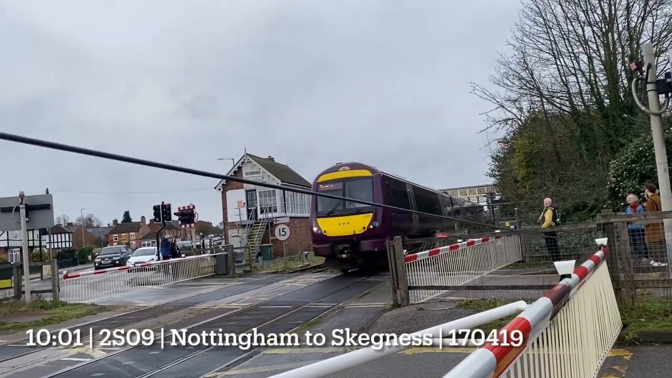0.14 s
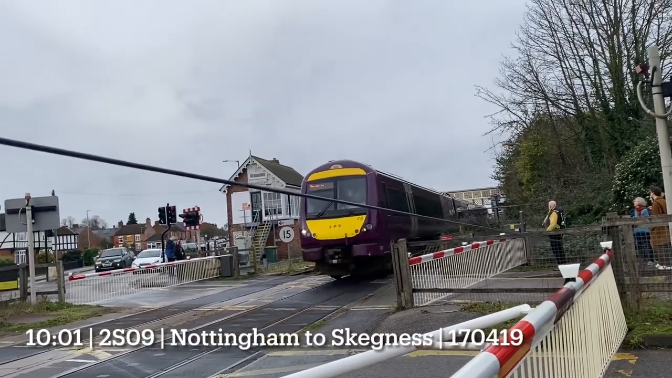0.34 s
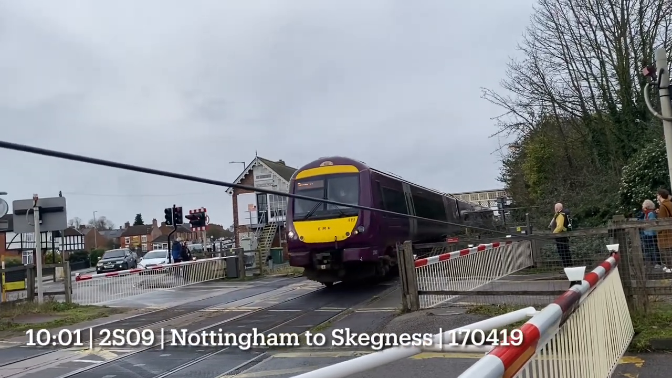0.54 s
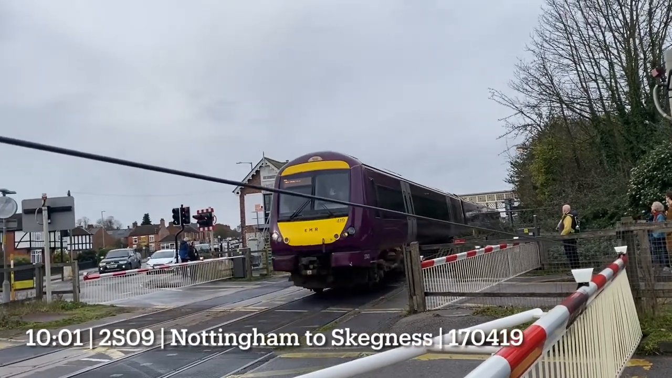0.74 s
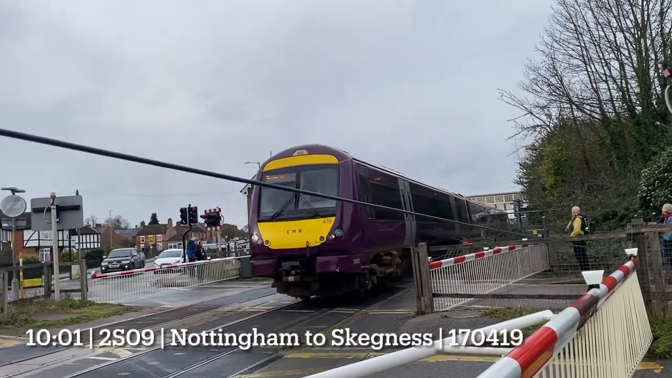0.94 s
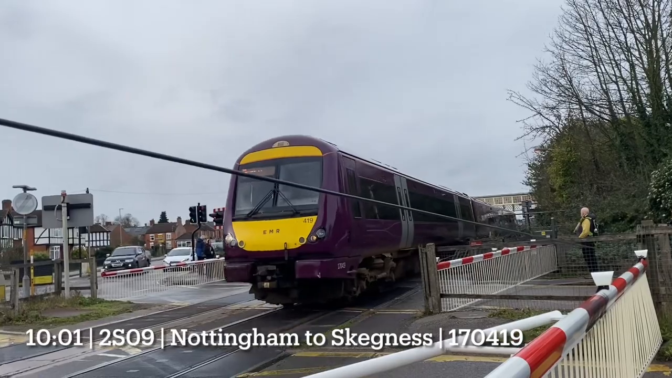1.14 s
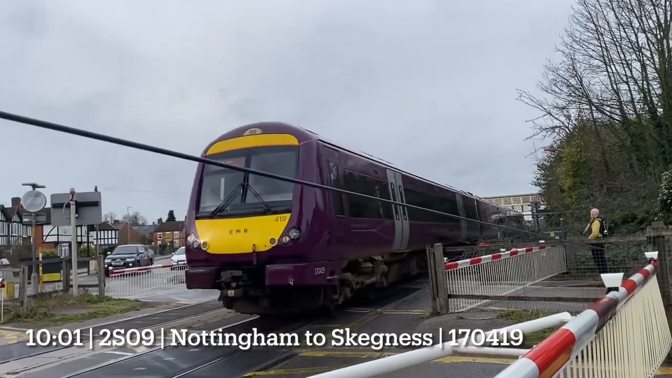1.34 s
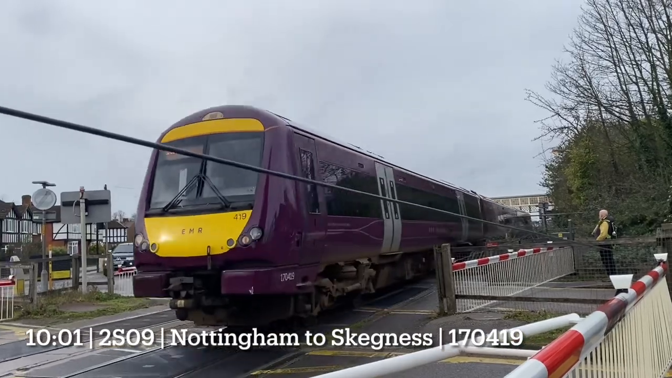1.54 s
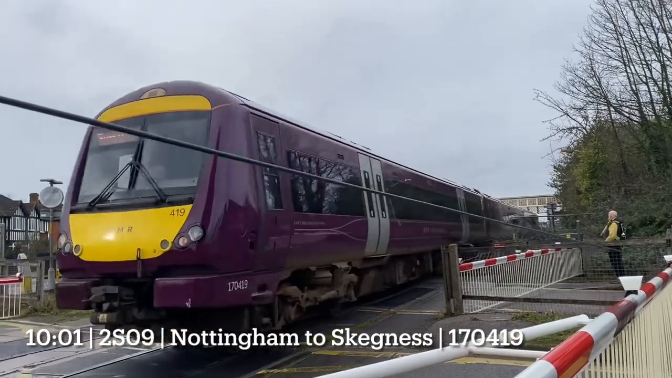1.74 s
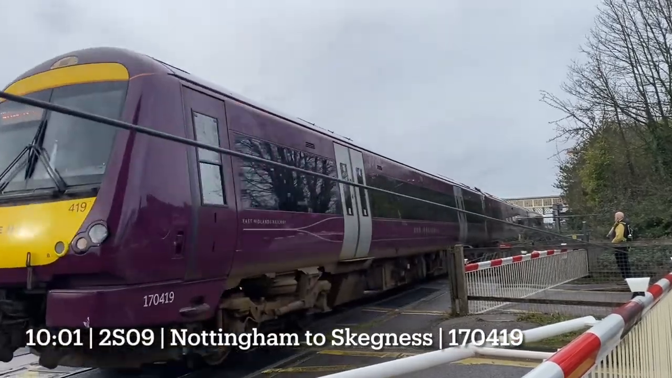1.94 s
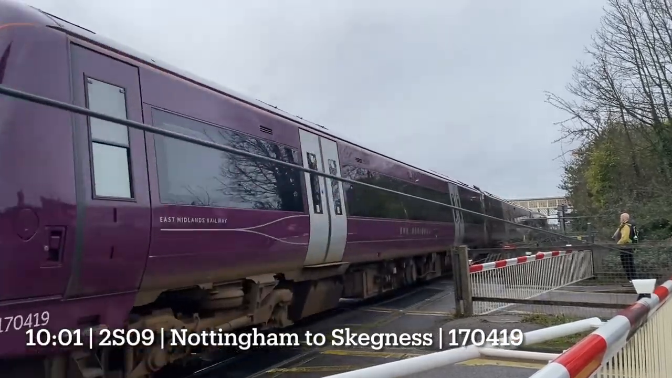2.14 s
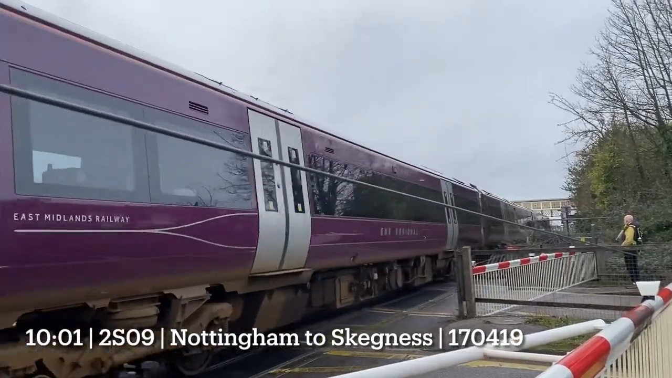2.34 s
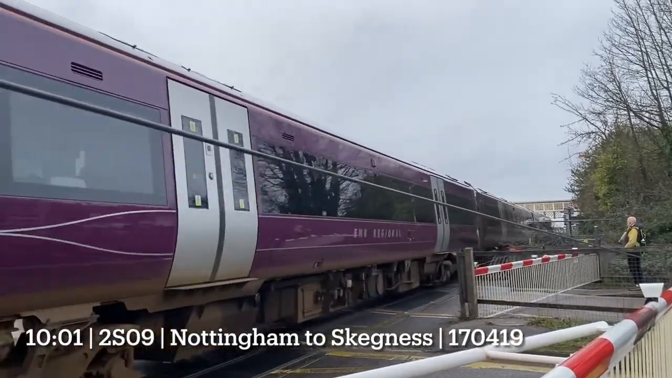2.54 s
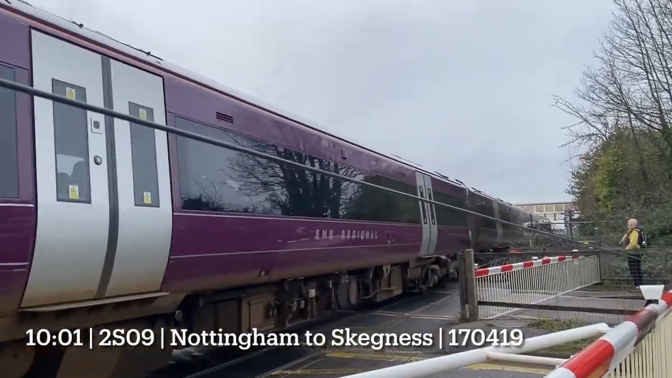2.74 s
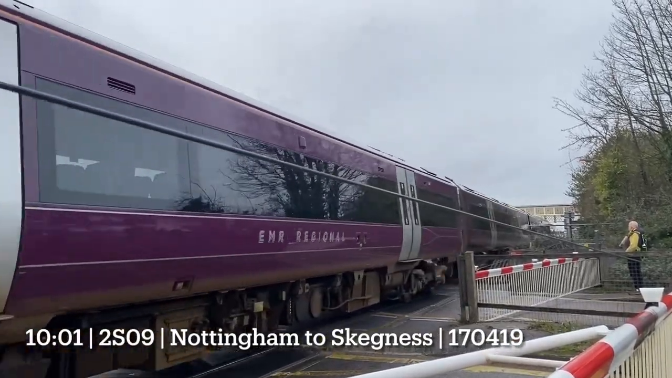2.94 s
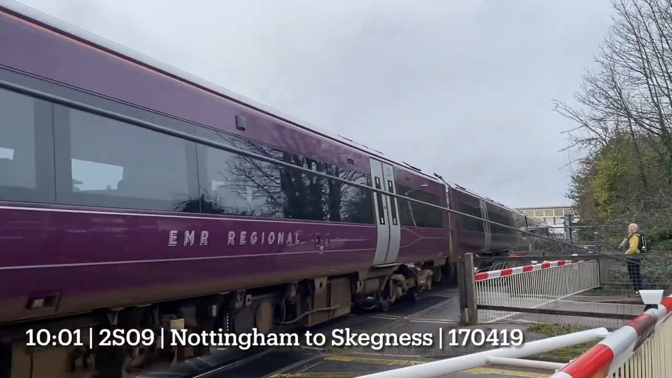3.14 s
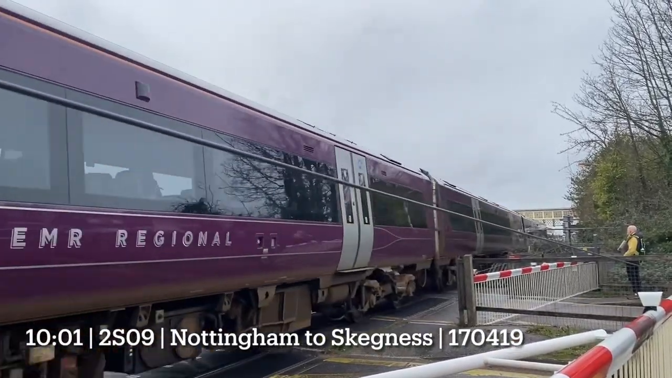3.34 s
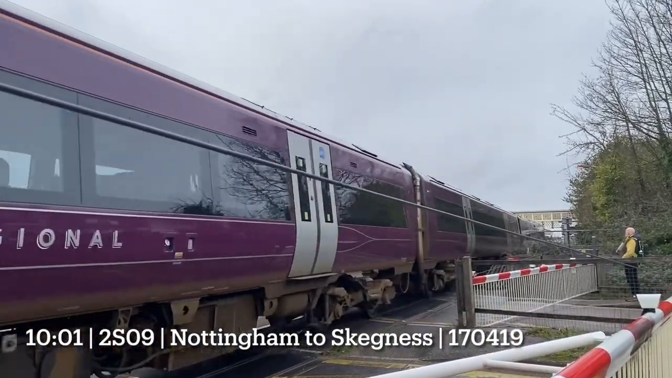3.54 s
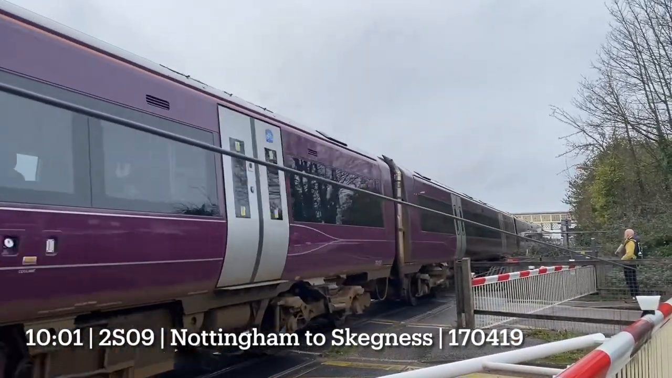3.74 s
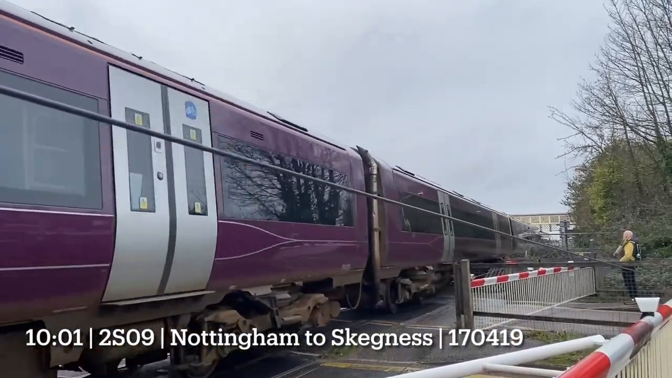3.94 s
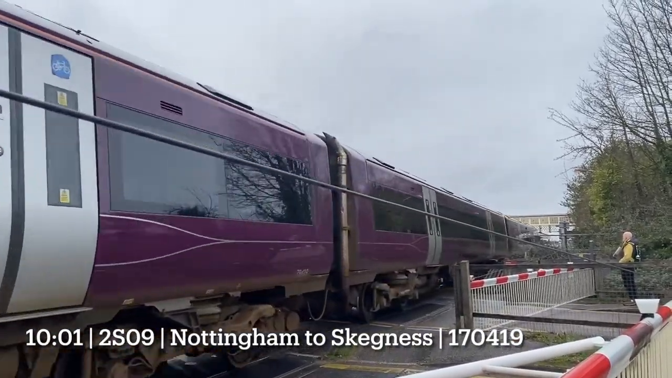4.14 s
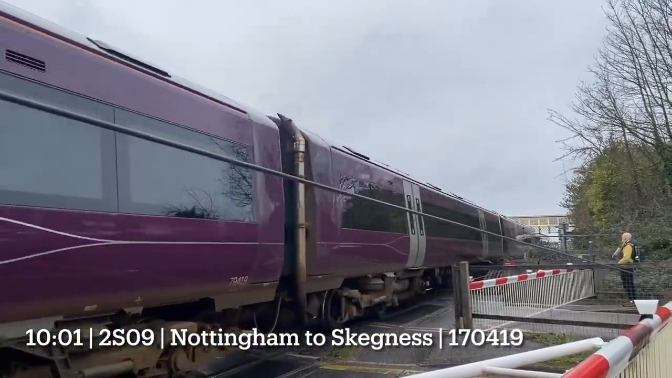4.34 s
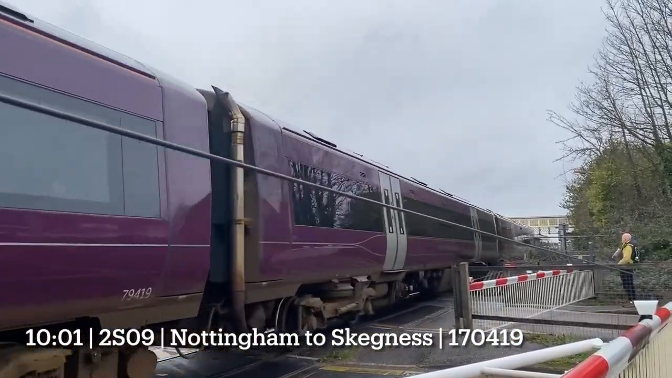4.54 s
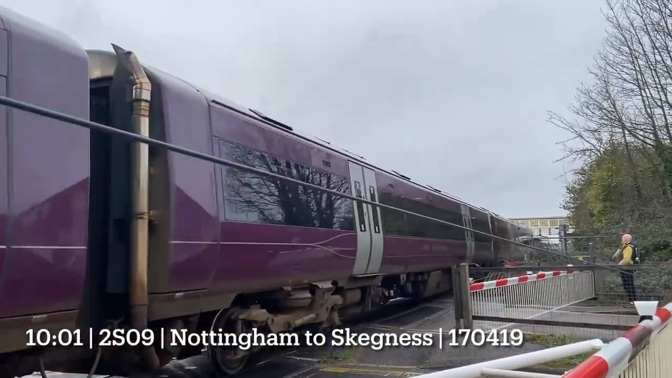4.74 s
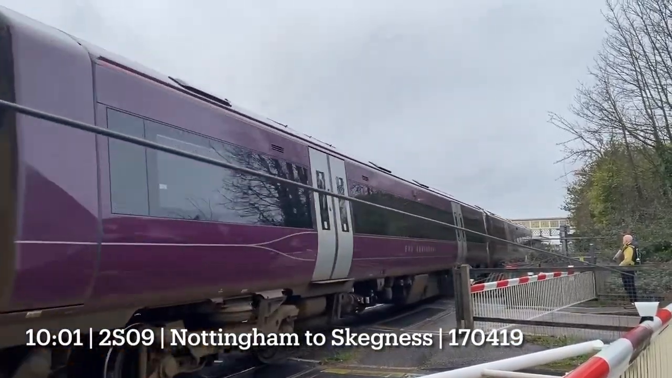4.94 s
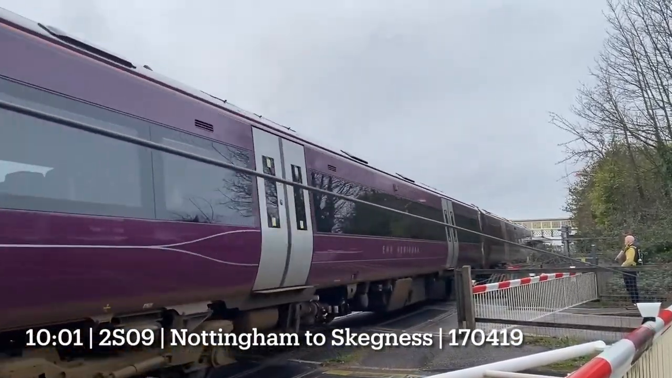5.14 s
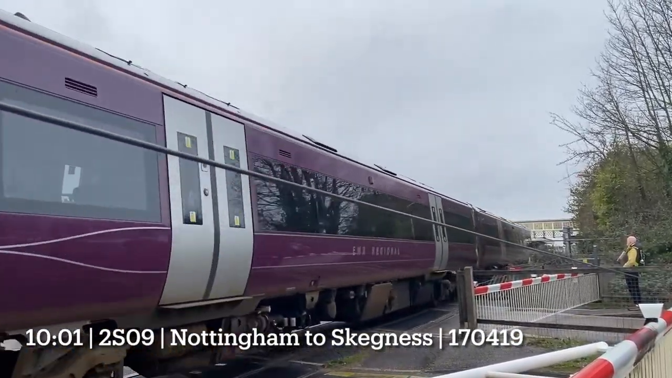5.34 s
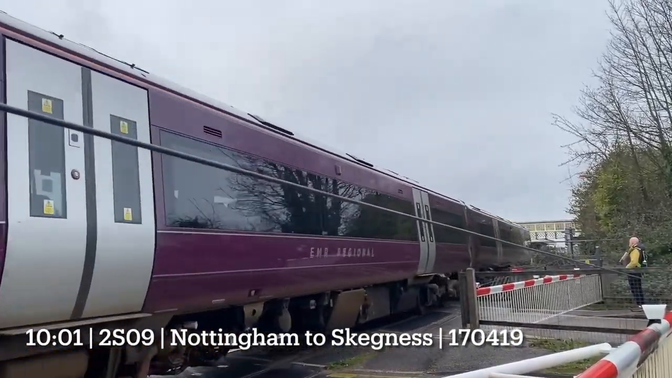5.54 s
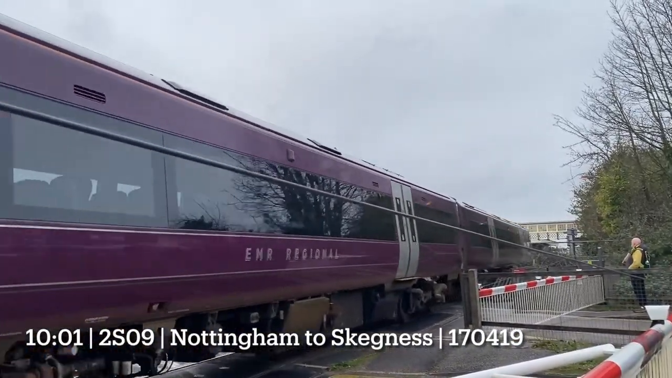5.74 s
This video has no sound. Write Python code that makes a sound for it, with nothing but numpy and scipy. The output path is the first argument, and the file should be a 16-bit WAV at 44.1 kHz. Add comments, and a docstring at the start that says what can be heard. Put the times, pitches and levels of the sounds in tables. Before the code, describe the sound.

Outdoors beside a level crossing, a diesel multiple-unit train approaches from ahead as low rumble and faint wheel singing, then passes a few metres to the left. Bogies thump and knock over a rail joint around three seconds, the level ducks briefly, then engine drone, steel scraping and further knocks continue, ending in bright hissing air. Close, full stereo pickup; the train is still passing at the end.

```python
"""A diesel passenger train comes from the front and passes a few metres away to the left, over a level crossing.
From the start rough wheels and rails roar as shaped noise, engines drone as stacked tones, and wavering tones hum and sing.
Soon slipping steel scrapes, the underframe thumps, and decaying tones and clicks knock, axle by axle, over a joint.
Going by, the engines sink in pitch; the level dips briefly just after three seconds.
At the end the second car brings a bright rush of air, made of hissing noise."""
import sys
import numpy as np
from scipy import signal
from scipy.fft import rfft, irfft, next_fast_len
from scipy.io import wavfile
from scipy.ndimage import uniform_filter1d

SR = 44100
rng = np.random.default_rng(int(sys.argv[2]) if len(sys.argv) > 2 else 0)


def unload_wav(signal):
    """Save mono or channel-first audio to the path in sys.argv[1] as 16-bit WAV at rate SR, clipped to [-1, 1]."""
    wavfile.write(
        sys.argv[1],
        SR,
        np.round(np.clip(np.atleast_2d(signal).T, -1, 1) * 32767).astype(np.int16),
    )


N = 259308
T = np.arange(N) / SR
HZ = np.maximum(np.arange(N // 2 + 1) * SR / N, 1)   # 1 at least, so that its logarithm exists
RIM_HZ = 2543   # the lower ring of a wheel's rim


def from_db(db):
    """Turn decibels into gain."""
    return 10 ** (np.asarray(db) / 20)


def rms_one(x):
    """Scale to unit power."""
    return x / np.sqrt(np.mean(x ** 2) + 1e-20)


def in_time(rows):
    """Draw a curve through points in time, at every sample."""
    s, value = np.transpose(rows)
    return np.interp(T, s, value)


def over_hz(points):
    """Draw a curve through points in pitch, on the frequency grid."""
    hz, value = np.transpose(points)
    return np.interp(np.log(HZ), np.log(hz), value)


def white():
    """The spectrum of fresh white noise: equal chance at every pitch."""
    return rng.standard_normal(len(HZ)) + 1j * rng.standard_normal(len(HZ))


def drift(rate_hz):
    """Slow random wandering with spread 1."""
    return rms_one(irfft(white() / (1 + (HZ / rate_hz) ** 2), N))


def arrive(x, lead_ms, left_db=0):
    """A sound from the left reaches the left microphone earlier, and can differ in level between the two."""
    half = np.exp(1j * np.pi * HZ * lead_ms / 1000) * from_db(left_db / 2)
    return irfft(rfft(x) * np.array([half, 1 / half]), N)


def passing(s, half_s):
    """Gain of a source that goes by, 1 when abeam."""
    return 1 / (1 + ((T - s) / half_s) ** 2)


def swell(s, half_s):
    """A smooth rise and fall, 1 at the top."""
    return np.exp(-((T - s) / half_s) ** 2)


def plateau(s, half_s):
    """A quick rise, a hold near 1 and a quick fall."""
    return 1 / (1 + ((T - s) / half_s) ** 6)


def distance_db(behind_m=0):
    """Loss with distance: a part of the train closes in at steady speed, then the train stays alongside."""
    speed_m_per_s, track_m, arrival_m = 9.2, 6.86, 22   # track: how far away the rails are
    ahead_m = np.maximum(arrival_m + behind_m - speed_m_per_s * T, 0)
    return 20 * np.log10(track_m / np.hypot(track_m, ahead_m))


def lifts_db():
    """Booms and passing bogies lift the four parts of the rolling noise."""
    # The underframe booms on uneven track. Each row: loudest in seconds, half length in seconds, lift in dB.
    boom_rows = [(0.033, 0.081, 8), (.33, 0.066, 6.5), (1.25, 0.065, 5.5), (1.473, 0.039, 3.5),
                 (2.056, 0.042, 3.5), (2.26, 0.044, 5.5), (2.6, 0.72, 5.5), (3.537, 0.13, 7),
                 (4.456, 0.17, 1), (5.356, 0.16, 4.5)]
    # Bogies rolling by. Each row: loudest in seconds, half length in seconds,
    # then the lift in dB of bogie roar, rail roar and wheel hiss.
    bogie_rows = [(2.0, 0.22, 0.5, 1.5, 0.5), (2.92, 0.66, 3, 4.9, 5.4), (4.16, 0.4, -1, 4, 4.5),
                  (4.95, 0.39, -1.8, 0.5, 3), (5.755, 0.59, 0.3, 4, 5)]
    boom_in_bogie = 0.34   # share of a boom's lift that the bogie roar takes
    boom = sum(db * swell(s, half_s) for s, half_s, db in boom_rows)
    bogie, rail, wheel = sum(np.outer(dbs, swell(s, half_s)) for s, half_s, *dbs in bogie_rows)
    return boom, bogie + boom_in_bogie * boom, rail, wheel


def ripple(depth_db, spacing_hz):
    """Wheels and rails have countless close modes: an uneven fine structure in the spectrum."""
    hz = np.arange(0, SR, spacing_hz)
    uneven = np.interp(HZ, hz, rng.standard_normal(len(hz)))
    return from_db(depth_db * uneven * np.minimum(HZ / 700, 1))


def rolling(ahead_ms=0.0078, flutter_hz=12, ripple_db=3.0, spacing_hz=35):
    """Rough steel shakes underframe, bogies, rails and wheels; the sound spreads from ahead round to the left."""
    # Tone colour as the train comes near, and alongside. Each row: pitch in Hz, relative level in dB per Hz.
    far_colour = [(20, -28), (42, 1), (66, 11), (120, 2.5), (230, -5.5), (480, -11), (600, -25), (750, -29),
                  (1100, -26), (1300, -30), (1500, -35), (1750, -38), (2200, -35), (3200, -39.5),
                  (4500, -38.5), (6000, -45.5), (12000, -93), (16000, -55)]
    near_colour = [(20, -39), (45, 3.5), (85, 9.5), (130, 1.5), (330, 1), (550, -10), (780, -14.5),
                   (1100, -17.5), (1450, -21.5), (2000, -21.5), (2500, -20), (3200, -27.5), (4600, -24.5),
                   (5200, -30), (6500, -33), (11500, -88), (16000, -40)]
    # Unscattered noise that arrives from the left. Each row: time in seconds, share of power from 0 to 1.
    abeam_rows = [(0, 0.15), (1.6, 0), (2.3, 0.13), (3.1, 0.77), (3.7, 0.33), (4.4, 0.97), (5.2, 0.46),
                  (5.88, 0.66)]
    # Scattered by road, fences and coach sides. Each row: pitch in Hz, share of power from 0 to 1.
    scatter_rows = [(50, 0), (150, 0.09), (350, 0.01), (700, 0.65), (1100, 0.22), (2000, 0.56),
                    (4000, 0.48), (8000, 0.56), (15000, 0.2)]
    # Underframe rumble, bogie roar, rail roar, wheel hiss. Each row: level alongside in dB before lifts,
    # share of the distance loss, flutter in dB, how much louder on the left in dB, left lead in ms.
    parts = [(-25, 0.26, 2.5, -1.5, 0.58), (-22.5, 0.52, 1.24, 3, 0.72), (-28.5, 0.88, 1.57, 2.5, 0.29),
             (-36, 1, 1.28, 0, 0.64)]
    abeam, scatter = in_time(abeam_rows), over_hz(scatter_rows)
    near = np.interp(T, [1.3, 2.4], [0, 1])
    # Four pitch zones, split at 150, 560 and 1600 Hz, whose powers add up to one.
    below = [1 / (1 + (HZ / edge) ** 8) for edge in (150, 560, 1600)]
    zones = np.sqrt(np.abs(np.diff([np.zeros_like(HZ), *below, np.ones_like(HZ)], axis=0)))
    colours = [from_db(over_hz(rows)) * ripple(ripple_db, spacing_hz) for rows in (far_colour, near_colour)]
    out, loss_db = 0, distance_db()
    for zone, lift_db, part in zip(zones, lifts_db(), parts):
        level_db, loss_share, flutter_db, left_db, lead_ms = part
        # Four paths: from ahead, from abeam, and scattered to each side.
        shares = (1 - scatter, 1 - scatter, scatter, scatter)
        noises = np.array([white() * np.sqrt(share) for share in shares])
        far, close = (rms_one(irfft(noises * zone * colour, N)) for colour in colours)
        paths = (1 - near) * far + near * close
        from_ahead = np.sqrt(1 - abeam) * arrive(paths[0], ahead_ms)
        from_left = np.sqrt(abeam) * arrive(paths[1], lead_ms, left_db)
        sound = from_ahead + from_left + paths[2:]
        # Even out the power over a fifth of a second, then set the level.
        sound = sound / np.sqrt(uniform_filter1d(sound.mean(0) ** 2, size=SR // 5))
        gain_db = level_db + loss_share * loss_db + lift_db + flutter_db * drift(flutter_hz)
        out = out + sound * from_db(gain_db)
    return out


def engine(block_db=-31, clatter_db=-39, rough=0.16, block_rough=0.36):
    """Cylinders fire in turn: a drone from the tailpipe, uneven multiples from the block, a rasp at each firing."""
    # Exhaust. Each row: time in seconds, average firing rate in Hz.
    firing = [(0, 77.39), (2.5, 77.13), (4.0, 76.45), (4.9, 75.5), (5.3, 75.6), (5.6, 74), (5.88, 72.9)]
    # Tailpipe drone. Each row: multiple of the firing rate, level from afar in dB.
    drone_rows = [(1, -34), (2, -32.5), (3, -37.5)]
    # The drone's partials swell in turn. Each row: multiple, loudest in seconds, half length in seconds, level in dB.
    swell_rows = [(1, 4.44, 0.18, -26.5), (1, 5.15, 0.39, -27.5), (1, 5.2, .04, -23), (1, 5.53, .04, -22),
                  (2, 4.31, 0.12, -28), (2, 5.1, .41, -19.5), (2, 5.02, .24, -30), (2, 5.74, 0.11, -25),
                  (3, 4.52, .2, -26.5), (3, 4.755, 0.07, -19.5), (3, 5.25, 0.32, -28), (3, 5.7, .1, -22.5)]
    # Engine block. Each row: multiple of the firing rate, relative level in dB.
    block_rows = [(3.67, -36.5), (4.33, -15), (5.5, -2.5), (6.33, -33), (8.17, -7), (9, -31), (10.33, -5),
                  (15.5, -17)]
    # Underfloor engines, one to a car. Each row: abeam in seconds, relative level in dB.
    engine_rows = [(2.8, -7), (5.75, 3.5)]
    pass_half_s = 0.84   # half length of an engine's pass
    turns = np.cumsum(in_time(firing) * (1 + 0.007 * drift(7.9))) / SR   # firings so far
    drone = 0
    for k, far_db in drone_rows:
        swells = sum(from_db(db) * plateau(s, half_s) for multiple, s, half_s, db in swell_rows if multiple == k)
        level = np.hypot(from_db(far_db), swells) * (1 + rough * drift(7))
        drone = drone + level * np.sqrt(2) * np.sin(2 * np.pi * (k * turns + rng.random()))
    block = 0
    for k, db in block_rows:
        level = from_db(db) * (1 + block_rough * drift(6.6))
        block = block + level * np.sin(2 * np.pi * (k * turns + 0.1 * drift(7.1)))
    rasp_colour = over_hz([(300, -19), (900, 56), (4500, 48), (8000, -74), (16000, -83)])
    rasp = irfft(white() * from_db(rasp_colour), N)
    clatter = rms_one(rasp * np.exp(-4 * (turns % 1)))   # fades after each firing
    nearness = sum(from_db(db) * passing(s, pass_half_s) for s, db in engine_rows)
    casing = nearness * (from_db(block_db) * block + from_db(clatter_db) * clatter)
    return arrive(drone, 0.065, -0.93) + arrive(casing, 0.27, 4.0)


def wavering_tone(s, hz, length_s, glide, width_hz):
    """A tone blurred by slow noise, like a resonance kept ringing, swells and fades, its pitch gliding if asked."""
    place = (T - s) / length_s
    heard = np.abs(place) < .5
    place, out = place[heard], np.zeros(N)
    # Slow complex noise makes the tone waver in level and pitch.
    count = next_fast_len(len(place) + 2)
    shape = 1 / (1 + (np.fft.fftfreq(count, 1 / SR) / width_hz) ** 2)
    wander = np.fft.ifft(white()[:count] * shape)[:len(place)]
    carrier = np.exp(2j * np.pi * np.cumsum(hz * (1 + glide * place)) / SR)
    tone = np.real(wander / np.abs(wander) ** .5 * carrier)   # the root tames the wavering
    out[heard] = np.cos(np.pi * place) * rms_one(tone)
    return out


def hums_and_singing(flicker_db=2.5, squeal_width_hz=17):
    """Low tones swell and fade; singing wheels share a set of tones, shifted a little, and squeal now and then."""
    # Low hums, booms and drone tones that swell and fade. Each row: loudest in seconds, pitch in Hz, level in dB,
    # length in seconds, glide as a share of the pitch, width in Hz.
    hum_rows = [(0.025, 60, -24, .22, 0, 6.6), (.06, 112, -25, .25, 0, 14),
                (0.301, 344.6, -35, .9, 0.002, 20), (2.55, 145, -24, 0.87, 0.0013, 25),
                (1.95, 189.5, -25, 0.71, 0.0066, 37), (2.3, 445, -20.5, 0.3, -0.12, 16),
                (2.62, 96, -20.5, .45, -0.014, 9.1), (2.852, 336.2, -27.5, 0.98, -0.0185, 12),
                (3.05, 214.5, -18.5, .2, -0.065, 33), (3.95, 445.4, -30.5, 0.99, -0.066, 14),
                (4.11, 238, -22.5, .17, 0, 8), (4.38, 249, -23, 0.32, -0.046, 6.7),
                (4.85, 338, -27.5, 0.49, -.02, 6), (5.7, 320, -24, .13, -.04, 5)]
    # Tones of a singing wheel. Each row: pitch in Hz before shifting, relative level in dB, width in Hz.
    wheel_tones = [(1093, -41, 7.1), (1300, -50.5, 11), (1900, -54, 30), (3776, -48.5, 14),
                   (4120, -50.5, 14)]
    # Wheels sing from afar, then bogie by bogie. Each row: loudest in seconds, length in seconds,
    # relative level in dB, brightening in dB per octave, pitch ratio, glide as a share of the pitch.
    singing_rows = [(0.697, 3.34, -10, -2, 0.95, 0.0012), (2.66, 1.6, 4.5, -1.5, 1, -.004),
                    (3.97, 1.4, -1, 2, 0.99, -.028)]
    # A wheel catches and squeals briefly. Each row: loudest in seconds, pitch in Hz, level in dB,
    # length in seconds, glide as a share of the pitch.
    squeal_rows = [(1.08, 1095, -45, .35, 0), (2.3, 1300, -38.5, .5, -.005), (3.45, 3755, -42, .12, 0),
                   (3.57, 1292, -39, .28, -.005), (3.6, 3758, -41.5, .15, -.002),
                   (3.83, 4085, -42, .2, -.004), (4.11, 3715, -39.5, .13, -.005),
                   (4.23, 3695, -41, .14, -.004), (4.24, 4060, -40, .08, -.006),
                   (4.33, 4610, -41.5, .3, -.012), (4.36, 4035, -40, .11, -.007)]
    out = 0
    for s, length_s, db, bright_db, ratio, glide in singing_rows:
        for hz, tone_db, width_hz in wheel_tones:
            octaves = np.log2(hz / wheel_tones[0][0])
            level_db = db + tone_db + bright_db * octaves + flicker_db * drift(11)
            out = out + from_db(level_db) * wavering_tone(s, hz * ratio, length_s, glide, width_hz)
    for s, hz, db, length_s, glide, width_hz in hum_rows:
        out = out + from_db(db) * wavering_tone(s, hz, length_s, glide, width_hz)
    for s, hz, db, length_s, glide in squeal_rows:
        out = out + from_db(db) * wavering_tone(s, hz, length_s, glide, squeal_width_hz)
    return arrive(out, 0.0068, 0.68)


def air(flutter_db=1.0, spread=0.033, lead_ms=0.2767):
    """Bright turbulent hiss grows as the train nears and rushes up with the second car."""
    # Tone colour of the hiss. Each row: pitch in Hz, relative level in dB.
    air_colour = [(2500, -6), (4800, 6), (7500, 2), (11500, 2.5), (16000, -10.5)]
    alongside_db, behind_m = -41.5, 5.7   # the hiss comes from a little behind the leading wheels
    rush_s, rush_half_s, rush_db = 5.91, 0.59, -32
    colour = from_db(over_hz(air_colour))
    direct, left, right = (rms_one(irfft(white() * colour, N)) for _ in range(3))
    hiss = arrive(direct, lead_ms) + spread * np.array([left, right])
    steady = from_db(alongside_db + distance_db(behind_m))
    level = np.hypot(steady, from_db(rush_db) * passing(rush_s, rush_half_s))
    return hiss / hiss.mean(0).std() * level * from_db(flutter_db * drift(90))


def ticks(fade_s=.0006):
    """Tiny, dry, very bright ticks: noise that starts at once and fades in a blink."""
    # Each row: start in seconds, level at the start in dB.
    tick_rows = [(.33, -48), (2.19, -30)]
    colour = over_hz([(6000, -25), (11000, 0), (16000, 0), (18000, -20)])
    bright = rms_one(irfft(white() * from_db(colour), N))
    bursts = sum(from_db(db) * (T >= s) * np.exp(-np.abs(T - s) / fade_s) for s, db in tick_rows)
    return arrive(bright * bursts, 0)


def scrapes(size_spread_db=3.0):
    """Steel sticks and slips: every slip sets one of the wheel's many close modes ringing for a moment."""
    # Flanges rub and grit is ground on the rail. Each row: loudest in seconds, half length in seconds, level in dB,
    # lowest pitch in Hz, highest pitch in Hz, slips per second, rise time of a slip in seconds, left lead in ms.
    scrape_rows = [(1.15, .24, -50, 6200, 7000, 400, .004, 0.0077),
                   (1.7, .4, -41, 924, 1800, 350, 0.0023, 0), (3.5, .08, -41, 5000, 5550, 300, .003, 0),
                   (3.6, 0.29, -38.5, 1750, 1950, 90, .005, 0),
                   (4.21, .16, -31.5, 1800, 2750, 600, 0.0021, 0.0044),
                   (4.18, .25, -40.5, 3600, 5400, 200, .004, 0.02),
                   (4.48, .1, -41.5, 5400, 6300, 400, 0.0034, 0),
                   (5.58, .07, -37, 4700, 5000, 240, .005, 0.2),
                   (5.67, .05, -37.5, 5150, 5450, 300, .004, 0.2),
                   (5.59, .2, -34, 5100, 7100, 1800, .0018, 0.167),
                   (5.79, .08, -34, 4250, 5400, 260, .004, 0.24),
                   (5.55, .25, -34.5, 10200, 12400, 1400, .001, 0.268),
                   (5.82, .085, -25.5, 10300, 12600, 3000, .0006, 0.268),
                   (5.8, .16, -39, 12500, 15500, 2000, .0005, 0.26)]
    out = 0
    for s, half_s, db, low_hz, high_hz, rate, slip_s, lead_ms in scrape_rows:
        age = T[:int(8 * slip_s * SR)]
        shape = age / slip_s * np.exp(-age / slip_s)
        slips = np.zeros(N + SR)
        for k, (late, pitch, phase, size) in enumerate(rng.random((2000, 4))):
            start = s - 2 * half_s + (k + 2 * late) / rate
            if 0 < start < min(s + 2 * half_s, T[-1]):
                i = int(start * SR)
                hz = low_hz + pitch * (high_hz - low_hz)
                gain = from_db(size_spread_db * np.sqrt(12) * size)   # root 12: an even chance gets this spread
                slips[i:i + len(age)] += gain * shape * np.sin(2 * np.pi * (hz * age + phase))
        slips = slips[:N] / slips[:N][np.abs(T - s) < 2 * half_s].std()
        out = out + arrive(from_db(db) * swell(s, half_s) * slips, lead_ms)
    return out


def thumps(level_db=-7.0, rise_s=0.0082, lead_ms=0.3):
    """A jolt on the crossing heaves the underframe through a few heavy cycles."""
    # Each row: start in seconds, relative peak level in dB, pitch in Hz.
    thump_rows = [(1.284, -10, 78.1), (1.449, -9, 225), (1.715, -7, 242), (1.904, -7.5, 156),
                  (2.022, -8, 231), (2.05, -7, 274), (2.054, -5, 126), (2.188, -8.5, 236),
                  (2.234, -6, 88.8), (2.252, -6, 425), (2.315, -7.5, 333), (2.424, -5, 102),
                  (2.427, -8, 349), (2.589, -5, 83.4), (2.674, -4.5, 230), (2.733, -7, 344),
                  (2.849, -3, 75.4), (2.865, -8, 392), (2.874, -5.5, 240), (3.039, -3, 194),
                  (3.042, -5, 263), (3.053, -7, 392), (3.082, -7, 225), (3.098, -4.5, 366),
                  (3.188, -5, 304), (3.363, -9, 344), (3.409, -8, 154), (3.484, -6, 72.7), (4.61, -9, 285),
                  (4.986, -6.5, 355), (4.997, -8.5, 470), (5.28, -7, 344), (5.29, -6.5, 645),
                  (5.852, -8, 532), (5.857, -6, 290)]
    out = 0
    for s, db, hz in thump_rows:
        age = np.clip(T - s, 0, 20 * rise_s)
        shape = age / rise_s * np.exp(1 - age / rise_s)   # 1 at its peak
        out = out + from_db(db + level_db) * shape * np.sin(2 * np.pi * hz * age)
    return arrive(out, lead_ms)


def rim_ring(age, upper_hz, rise_s=0.0024, lower_db=-1.5):
    """The struck rim rings briefly at two pitches."""
    lower, upper = (np.sin(2 * np.pi * (hz * age + rng.random())) for hz in (RIM_HZ, upper_hz))
    return (from_db(lower_db) * lower + upper) * age / rise_s * np.exp(1 - age / rise_s)


def knocks(thud_db=2.0, click_db=-20.5, ring_db=-20.5, crack_db=-23, shake_s=0.007, left_db=3):
    """A wheel drops over a joint: a crack, a short steel click and ring, then the bogie shakes for a moment."""
    # Wheels over rail joints. Each row: start in seconds, relative thud level in dB, left lead in ms,
    # relative steel click level in dB, click centre in Hz, click fade time in seconds, relative rim ring level in dB.
    knock_rows = [(1.722, -5, 0.17, -13, 3820, .01, -14), (2.051, -3.5, 0.12, -11, 2960, .01, -12),
                  (2.674, -4.5, 0.032, -13, 2600, .01, -13), (2.865, -2.5, 0.3, -17, 2600, .01, -17),
                  (3.045, -1, 0.49, -16, 2500, .01, -16), (3.096, 4.5, 0.45, 1.5, 4790, .007, 2.5),
                  (3.410, 4, 0.41, -0.5, 4530, .013, -2), (4.078, -4, 0.038, -9, 3750, .012, -9),
                  (4.604, -4, 0.28, -19, 2600, .01, -19), (4.984, 3.5, 0.5, -1, 4720, .008, 1),
                  (5.003, 1.5, .5, -10, 4680, .01, -14), (5.277, 3.5, 0.46, -3, 4020, .014, -8),
                  (5.294, 3.5, .46, -11, 4020, .01, -14), (5.844, 5, 0.48, -0.5, 4560, .012, -4)]
    # Wheel and track. Each row: pitch in Hz, relative level in dB, time to fade by 60 dB in seconds.
    wheel_modes = [(171.5, -52, 0.027), (268, -14.5, 0.05), (355, -16.5, 0.08), (452, -22, 0.1),
                   (528, -19, 0.1), (602, -22, 0.067), (655, -20.5, 0.08), (858, -19, 0.066),
                   (1086, -24.5, 0.083), (1730, -57, 0.031)]
    # The dry crack of steel on steel. Each row: pitch in Hz, relative level in dB per Hz.
    crack_colour = [(300, -20), (750, 4), (1500, 0), (4500, -7), (7000, -17), (14000, -32)]
    out, age = np.zeros((2, N)), T[:SR // 4]
    for s, level_db, lead_ms, steel_db, centre_hz, click_s, rim_db in knock_rows:
        blow = 0
        for hz, mode_db, t60 in wheel_modes:
            force = rng.standard_normal(len(age)) * np.exp(-age / shake_s)
            decay = from_db(-60 * age / t60)
            ring = signal.fftconvolve(force, decay * np.sin(2 * np.pi * hz * age))[:len(age)]
            ring = rms_one(ring) * np.sqrt(np.mean(decay ** 2) / 2)   # as strong as a plain fading tone
            blow = blow + from_db(level_db + mode_db + thud_db) * ring
        # Two damped resonances of the rim colour the click.
        rim = 1 / (1 + 1j * (HZ - centre_hz) / 220) + 0.73 / (1 + 1j * (HZ - RIM_HZ) / 220)
        click = rms_one(irfft(white() * rim * from_db(over_hz([(5000, 3), (9000, -16)])), N)[:len(age)])
        crack = rms_one(irfft(white() * from_db(over_hz(crack_colour)), N)[:len(age)])
        contact = from_db(click_db) * click + from_db(crack_db) * crack
        blow = blow + from_db(steel_db) * contact * np.exp(-age / click_s)
        blow = blow + from_db(ring_db + rim_db) * rim_ring(age, centre_hz)
        out += arrive(np.interp(T - s, age, blow, left=0, right=0), lead_ms, left_db)
    return out


def dip(start_s=3.112, fall_s=0.035, recovery_s=0.18):
    """The level drops quickly, by between 6 and 7 dB at most, and creeps back."""
    age = np.maximum(T - start_s, 0)
    return from_db(-8 * np.minimum(age / fall_s, 1) * np.exp(-age / recovery_s))


def scene():
    """Everything heard beside the rails; the dip takes all but the ticks."""
    train = rolling() + engine() + hums_and_singing() + scrapes() + thumps() + knocks() + air()
    return train * dip() + ticks()


def record(dry):
    """The two microphones differ in colour, the highest peaks are rounded and the top is cut."""
    # Left microphone over right. Each row: pitch in Hz, difference in dB.
    mic_balance = [(130, -0.5), (260, -1.5), (480, 3.5), (900, -0.5), (2000, 0), (4000, -0.5), (8000, -0.5)]
    cutoff_hz = 15800
    heard = irfft(rfft(dry) * from_db(over_hz(mic_balance) * [[.5], [-.5]]), N)
    rounded = heard / (1 + (heard / .95) ** 8) ** (1 / 8)
    low_pass = signal.ellip(10, .05, 60, cutoff_hz, fs=SR, output="sos")
    return signal.sosfiltfilt(low_pass, rounded)


dry = scene()
out = record(dry)
unload_wav(out)
```